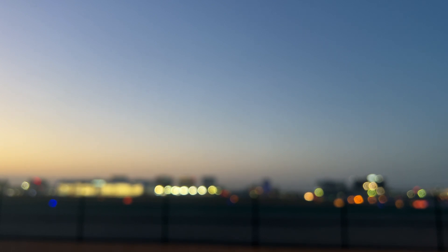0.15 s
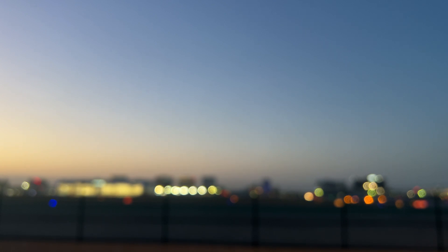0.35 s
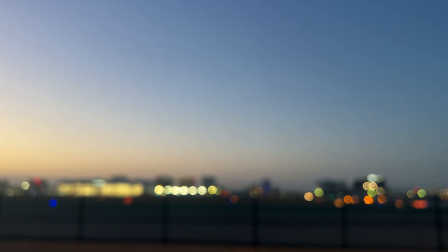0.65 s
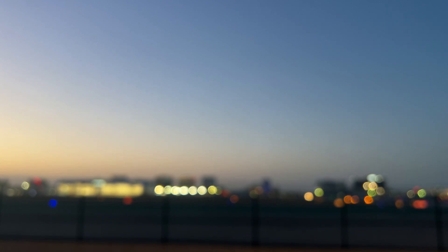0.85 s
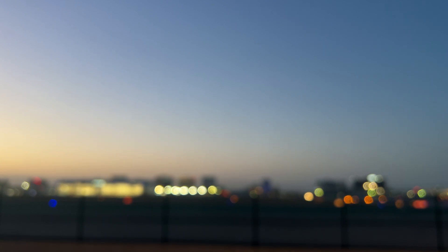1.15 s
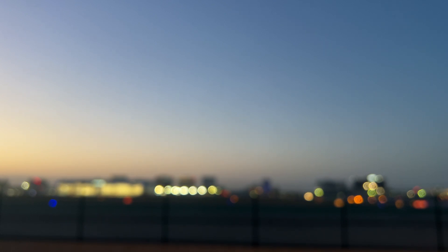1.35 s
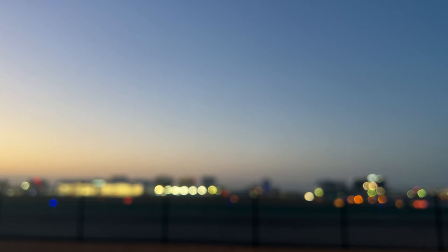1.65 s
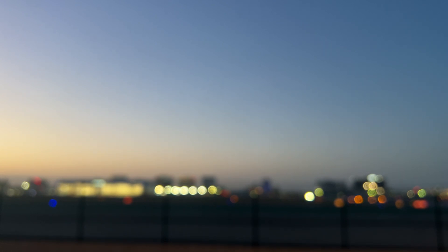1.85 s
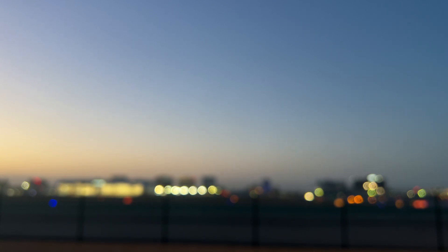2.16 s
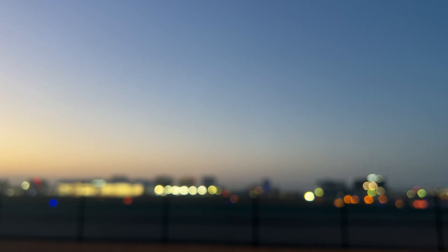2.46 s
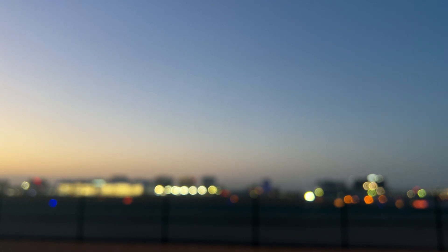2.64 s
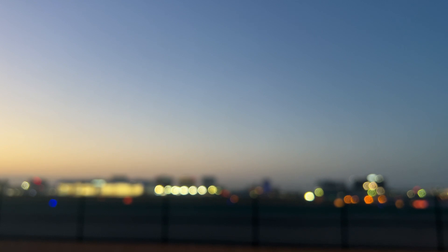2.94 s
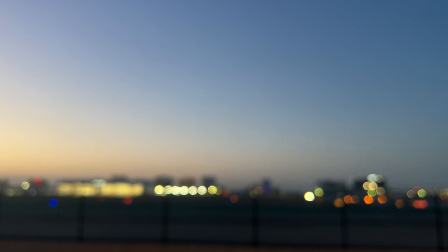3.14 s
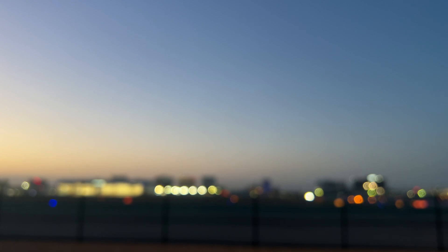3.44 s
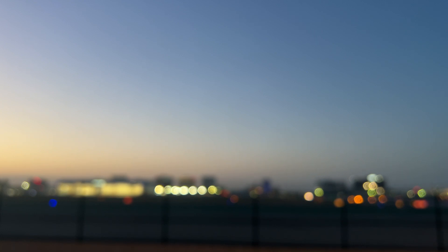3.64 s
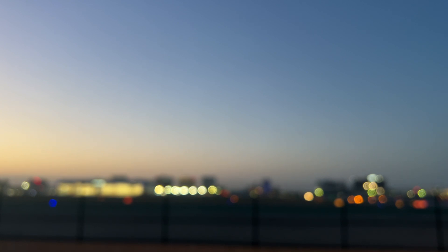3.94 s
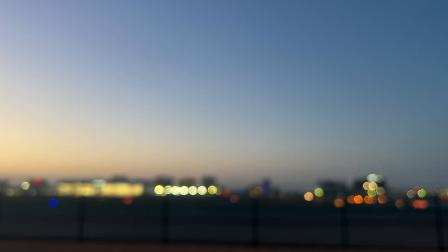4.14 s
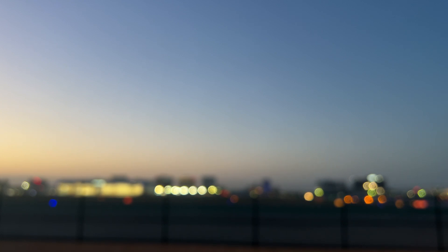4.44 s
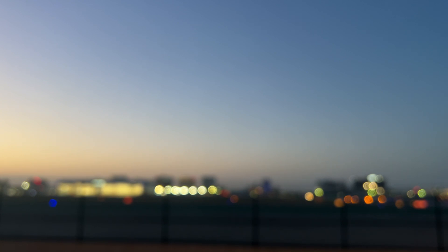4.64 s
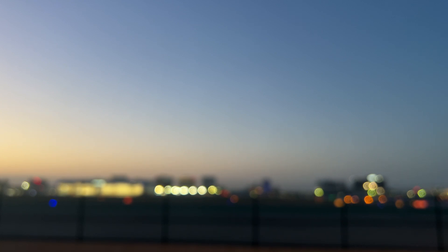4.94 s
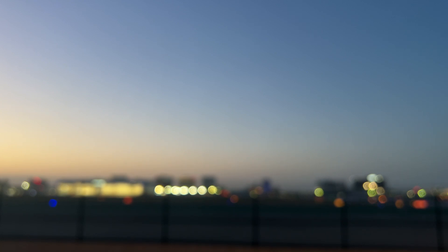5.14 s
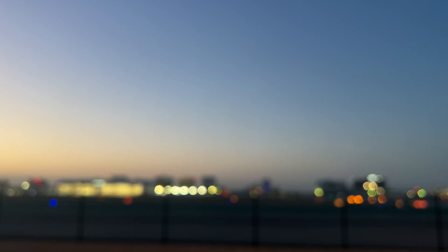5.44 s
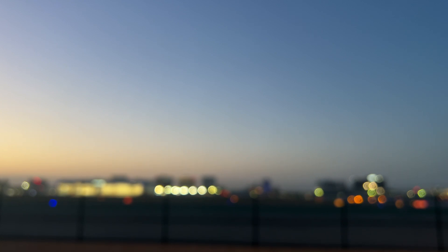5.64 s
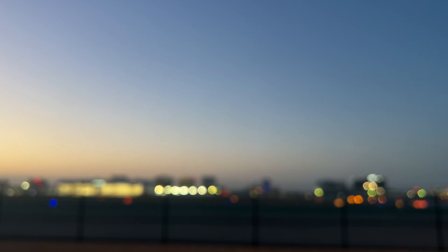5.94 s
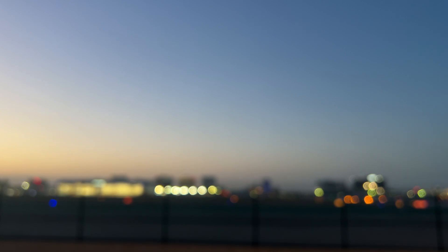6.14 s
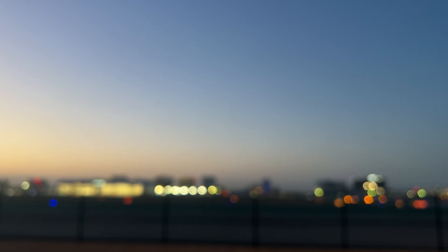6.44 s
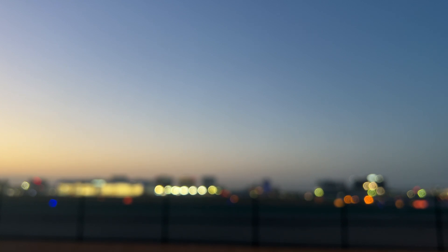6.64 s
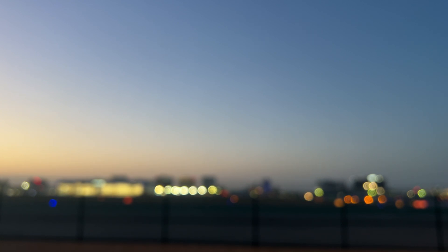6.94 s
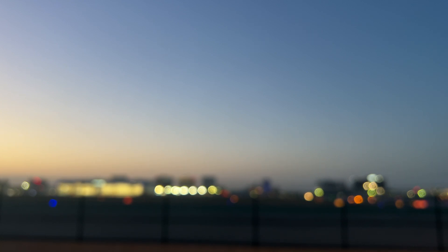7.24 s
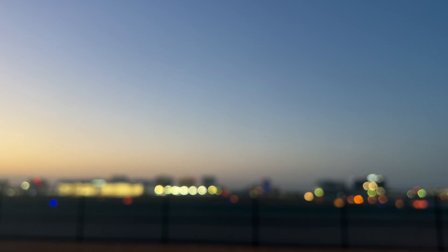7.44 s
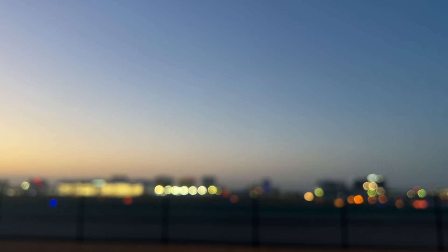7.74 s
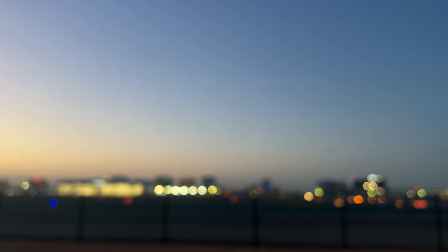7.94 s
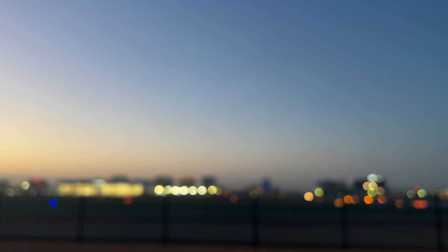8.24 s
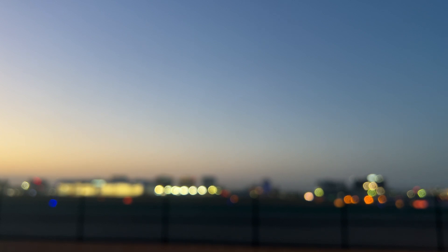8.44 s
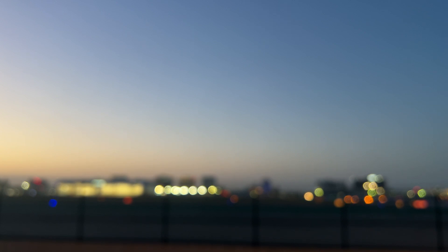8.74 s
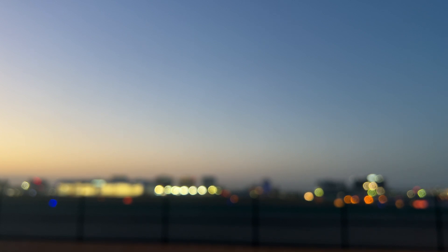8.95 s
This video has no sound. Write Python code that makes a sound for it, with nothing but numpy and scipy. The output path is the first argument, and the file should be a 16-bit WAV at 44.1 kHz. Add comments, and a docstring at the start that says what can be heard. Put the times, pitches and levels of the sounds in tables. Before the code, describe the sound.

A low rumble of distant city traffic carries across an open field for about nine seconds, with a soft tyre hiss above it. A far machine holds a deep hum and a faint whine. Throughout, slightly to the left, a very faint cricket ticks out quick, high double chirps under a thin, fluttering insect chorus. A distant engine swells briefly at the start and again between about 4 and 5.5 seconds. Soft bass swells come near 1.7 and 4 seconds. From around 5 seconds heavy trucks draw nearer, with dull, muffled booms scattered until about 8.5 seconds. Their growl and low engine note are closest just after 7 seconds, then ease a little. The machine drone, strongest at 5 seconds, sinks away by 8 seconds. Faint tyre swishes pass near the end as the rumble continues.

```python
"""A city at dusk, from across an open field, on two closely spaced microphone ports.
From the start far traffic rumbles, tyres hiss and a machine drones; in the grass a faint cricket
ticks out double chirps under a thin insect chorus. Now and then a far engine pulls. Heavy traffic
draws near with dull booms and is closest at about 7 s; the drone sinks as it passes."""
import sys
import numpy as np
from scipy.fft import rfft, irfft, next_fast_len
from scipy.io import wavfile
from scipy.ndimage import map_coordinates

SR = 44100
rng = np.random.default_rng(int(sys.argv[2]) if len(sys.argv) > 2 else 0)


def transcribe(u):
    """Save the signal u as a 16-bit wav file named by the first command-line argument.

    u: samples, shape (n,) or (channels, n), limited to [-1, 1]; the rate is SR.
    q: integer samples, one column per channel.
    """
    v = np.clip(np.atleast_2d(u).T, -1, 1)
    q = np.round(v * 32767).astype(np.int16)
    wavfile.write(sys.argv[1], SR, q)


N = 400869
T = np.arange(N) / SR

# spectrum of the road rumble: frequency_hz, density_db
RUMBLE_SPECTRUM = [(15, -42), (25, -29.5), (35, -16), (46, -11.5), (64, 1), (80, -4), (100, -5),
                   (118, -11.5), (200, -25.5), (500, -78)]


def traffic(rumble_db=-38, engines_db=-37.5, roar_db=-50):
    """Countless far vehicles merge and follow one flow; moving air makes each band drift on its own."""
    # spectra of engines, tyre roar and tyre hiss: frequency_hz, density_db
    engine_spectrum = [(60, -30.5), (112, -4), (146, -0.5), (185, 0.5), (205, -0.5), (245, -4), (270, -6.5),
                       (320, -6.5), (380, -8.5), (450, -10.5), (540, -13.5), (650, -16.5), (1000, -20),
                       (3000, -77)]
    roar_spectrum = [(250, -28), (550, -20), (750, -5.5), (980, -3), (1300, -5.5), (1550, -8), (2000, -19),
                     (3000, -48.5)]
    hiss_spectrum = [(1000, -26), (1500, -1), (1750, 0), (2000, 0.5), (2500, -3.5), (3000, -9), (3350, -10),
                     (4080, -17), (4520, -12.5), (5000, -26.5), (9000, -48.5)]
    # how busy the roads are, on top of every layer's level: time_s, gain_db
    flow = [(0, 1.5), (4.2, 0.5), (5.9, -0.9), (7.2, 0.4), (9, 0.5)]
    # the tyre hiss ebbs and returns: time_s, level_db
    hiss_levels = [(0, -57.5), (4.3, -58), (6.6, -56), (7.3, -57), (8.2, -57), (9, -57)]
    flow_db, = curves(flow)
    hiss_db, = curves(hiss_levels)
    rumble = amp(rumble_db + 0.67 * wobble(2.7)) * far_noise(RUMBLE_SPECTRUM)
    engines = amp(engines_db + 0.3 * wobble(6.6)) * far_noise(engine_spectrum)
    roar = amp(roar_db + 0.3 * wobble(18)) * far_noise(roar_spectrum)
    hiss = amp(hiss_db + 0.7 * wobble(12)) * far_noise(hiss_spectrum)
    return amp(flow_db) * (rumble + engines + roar + hiss)


def heavy_traffic(closest_s=7.27, half_power_s=2.01, rumble_db=-35.5, growl_db=-37.5, note_db=-47):
    """Lorries pass on a straight road, fading as one over distance; the nearest one's note stands out."""
    # spectrum of the heavy engines: frequency_hz, density_db
    growl_spectrum = [(60, -32), (118, -7.5), (145, 3), (190, -1.5), (240, 0), (310, -3), (380, -9.5),
                      (450, -8.5), (520, -18), (650, -17.5), (1000, -19), (3000, -76)]
    nearness = 1 / np.hypot(1, (T - closest_s) / half_power_s)
    note = amp(note_db) * swell(peak_s=7.4, width_s=1.0) * tone(hz=128, drift_hz=.7, waver_db=2.0)
    rumble = amp(rumble_db) * far_noise(RUMBLE_SPECTRUM)
    growl = amp(growl_db + 0.68 * wobble(6.2)) * far_noise(growl_spectrum)
    return note + nearness * (rumble + growl)


def booms(width_octaves=0.27):
    """Distance leaves only a rounded swell of bass from each heavy bump."""
    # far bumps: peak_s, level_db, pitch_hz, width_s
    bumps = [(1.7, -38, 60.4, 0.23), (4.1, -33, 64, 0.15), (5.207, -36, 197, 0.07),
             (5.885, -32.5, 142, 0.042), (5.89, -35, 60.4, 0.066), (6.05, -40.5, 238, .1),
             (6.85, -26, 54, 0.035), (7.057, -34, 83.5, 0.14), (7.166, -30, 173, 0.018),
             (7.346, -29.7, 61, 0.03), (8.104, -29.5, 70, 0.088), (8.307, -29, 58.7, 0.12),
             (8.59, -36, 146, 0.051)]
    total = np.zeros(N)
    for peak_s, level_db, pitch_hz, width_s in bumps:
        band = noise_band(pitch_hz, width_octaves)
        envelope = swell(peak_s, width_s)
        rms_in_swell = np.sqrt(np.average(band ** 2, weights=envelope ** 2))
        total += amp(level_db) * envelope * band / rms_in_swell
    return total


def machine_drone(hum_hz=90.24, whine_hz=440.6):
    """A far machine holds a deep hum and a faint whine; both sink late on."""
    # strength of the two tones: time_s, hum_db, whine_db
    drone_levels = [(0, -38, -58.5), (3, -39, -60), (5, -36.5, -54.5), (6.3, -41.5, -58.5),
                    (7.5, -49, -56.5), (8.1, -55, -65)]
    hum_db, whine_db = curves(drone_levels)
    hum = tone(hum_hz, drift_hz=.4, waver_db=1.0)
    whine = tone(whine_hz, drift_hz=.4, waver_db=1.0)
    return amp(hum_db) * hum + amp(whine_db) * whine


def engine_pulls(width_octaves=.07):
    """The note of one engine swells out of the rumble under load, blurred by the distance."""
    # the engine pulls, then eases off: peak_s, level_db, pitch_hz, width_s
    pulls = [(0.151, -39, 187, 0.26), (3.95, -41.5, 185.5, 0.37), (4.716, -43, 182, 0.15),
             (5.35, -39.5, 159, .1)]
    return sum(amp(level_db) * swell(peak_s, width_s) * noise_band(pitch_hz, width_octaves)
               for peak_s, level_db, pitch_hz, width_s in pulls)


def tyre_swishes(skirt_db=-20):
    """The tyres of one far car at a time rise briefly out of the wash."""
    # single cars: peak_s, level_db, pitch_hz, width_s
    cars = [(0.48, -51, 765, 0.08), (2.401, -68.5, 2810, 1.2), (8.02, -62.5, 2180, .2),
            (8.52, -60.5, 2090, 0.082)]
    total = np.zeros((2, N))
    for peak_s, level_db, pitch_hz, width_s in cars:
        spectrum = [(pitch_hz / 10, -90), (pitch_hz / 2, skirt_db), (pitch_hz, 0),
                    (pitch_hz * 2, skirt_db), (pitch_hz * 10, -120)]
        total += amp(level_db) * swell(peak_s, width_s) * far_noise(spectrum)
    return total


def cricket(start_hz=6850, end_hz=6000, scatter_hz=45, stroke_s=.012, spacing_s=.021, period_s=.124):
    """Each chirp is two wing strokes; the pitch falls as the wing slows along the file."""
    # the cricket is keenest early on: time_s, level_db
    chirp_levels = [(0.5, -68), (1, -63.5), (2, -65.5), (2.9, -63), (4.6, -67), (9, -66)]
    chirps_s = np.arange(.109, N / SR - period_s / 2, period_s)
    chirps_s += .003 * rng.standard_normal(len(chirps_s))
    progress = np.linspace(0, 1, round(stroke_s * SR))
    song = np.zeros(N + SR)
    for starts_s, stroke_db in (chirps_s - spacing_s, -3), (chirps_s, 0):  # the first stroke is softer
        for start_s, (sharpness, strength) in zip(starts_s, rng.standard_normal((len(starts_s), 2))):
            pitch_hz = start_hz + (end_hz - start_hz) * progress + scatter_hz * sharpness
            stroke = np.sin(np.pi * progress) ** 2 * np.sin(2 * np.pi * np.cumsum(pitch_hz) / SR)
            song[round(start_s * SR):][:len(stroke)] += amp(stroke_db + 2.0 * strength) * stroke
    level_db, = curves(chirp_levels)
    return amp(level_db) * song[:N] * amp([[3.0], [-3.0]])  # louder at the left port


def insects(flutter_db=0.83):
    """Many far insects blur into a soft hiss and a narrow, fluttering trill; one sings lower."""
    # spectra of the trill and the soft hiss: frequency_hz, density_db
    trill_spectrum = [(6800, -46.5), (7300, -21.5), (7550, -15.5), (7800, -5.5), (7970, -1.5), (8030, -0.5),
                      (8062, 3.5), (8100, 1), (8350, -9), (8600, -19), (8900, -42)]
    hiss_spectrum = [(3500, -46), (4500, -15), (4900, -11), (5250, -13.5), (5550, -11.5), (5870, -10),
                     (6250, -14.5), (6550, -15.5), (7100, -16.5), (7600, -10.5), (8500, -30.5),
                     (9000, -51.5)]
    # each swells and rests: time_s, level_db
    trill_levels = [(1.7, -66.5), (2.4, -72), (3.7, -66), (4.3, -65), (4.7, -69), (5.25, -67),
                    (6.15, -67.5), (6.55, -65), (7.3, -67), (8, -63.5), (8.8, -70)]
    hiss_levels = [(0, -67), (1.1, -65.5), (2.2, -66.5), (6.3, -66.5), (7.25, -65), (8.1, -65), (8.8, -68)]
    # a lone insect's held note: pitch_hz, level_db, width_octaves
    lone_note = (6430, -86, .005)
    trill_db, = curves(trill_levels)
    hiss_db, = curves(hiss_levels)
    lone_hz, lone_db, lone_octaves = lone_note
    trill = amp(trill_db + flutter_db * wobble(30)) * far_noise(trill_spectrum)
    hiss = amp(hiss_db + .3 * wobble(4.2) + 0.82 * wobble(25)) * far_noise(hiss_spectrum)
    return trill + hiss + amp(lone_db) * noise_band(lone_hz, lone_octaves)


def far_noise(spectrum):
    """Stereo noise of rms 1: alike at both ports in the bass, shifted and less alike higher up."""
    # far sound at the two ports: frequency_hz, likeness (0-1), left_lead_rad
    ports = [(90, 0.97, .05), (235, 0.86, 0.15), (390, 0.76, 0.41), (574, .58, 1.98), (660, 0.7, 2.25),
             (720, 0.72, 2.76), (1020, 0.72, 2.57), (1193, 0.05, 3.7), (1506, 0.79, 3.15), (1807, 0.3, 4.4),
             (1900, 0.2, 6.2), (2140, 0.7, 6.45), (2690, 0.8, 6.7), (3160, 0.2, 8.85), (3800, 0.01, 9.4),
             (4470, 0.4, 9.5), (5480, 0.3, 11.4), (5720, 0.3, 15), (6130, 0.3, 17), (7370, 0.3, 10.7),
             (8000, 0.6, 13)]
    # balance between the ports: frequency_hz, left_minus_right_db
    balance = [(100, -0.5), (450, 0.8), (750, 0), (1100, -2), (1400, 0.5), (1900, -0.5), (2500, -3),
               (3400, 0), (4500, 3), (5700, 12.5), (7500, 8.5), (8100, 4.5)]
    size = next_fast_len(N + 8192)
    hz = np.fft.rfftfreq(size, 1 / SR)
    common, apart = rfft(rng.standard_normal((2, size)))
    likeness, lead_rad = along(ports, hz)
    blend_rad = np.arccos(np.clip(likeness, 0, 1)) / 2
    side = np.array([[1], [-1]])  # left, right
    pair = np.cos(blend_rad) * common + side * np.sin(blend_rad) * apart
    pair *= np.exp(.5j * side * lead_rad)
    colour = amp(along(spectrum, hz)[0] + side * along(balance, hz)[0] / 2)
    return unit(irfft(pair * colour, size)[:, :N])


def noise_band(pitch_hz, width_octaves):
    """Noise of rms 1 in a bell around one pitch."""
    noise = rng.standard_normal(N)
    return unit(filtered(noise, lambda hz: np.exp(-.5 * (np.log2((hz + 1) / pitch_hz) / width_octaves) ** 2)))


def tone(hz, drift_hz, waver_db):
    """A clean far tone of rms 1 that drifts and wavers a little."""
    gain = amp(waver_db * wobble(5))
    pitch_hz = hz + drift_hz * wobble(1.5)
    return unit(gain * np.sin(2 * np.pi * np.cumsum(pitch_hz) / SR))


def swell(peak_s, width_s):
    """A bell in time, of height 1 and standard deviation width_s."""
    return np.exp(-.5 * ((T - peak_s) / width_s) ** 2)


def wobble(rate):
    """A smooth random curve, rate knots a second."""
    knots = rng.standard_normal(int(N * rate / SR) + 4)
    return map_coordinates(knots, [np.arange(N) * rate / SR])


def curves(rows):
    """One value per sample for each column after the time."""
    time_s, *columns = np.transpose(rows)
    return [np.interp(T, time_s, column) for column in columns]


def along(rows, hz):
    """Each column after the frequency, read at hz on a log axis."""
    row_hz, *columns = np.transpose(rows)
    return [np.interp(np.log(hz + 1), np.log(row_hz + 1), column) for column in columns]


def filtered(x, response):
    """x shaped by a gain that depends on frequency."""
    size = next_fast_len(N + SR // 2)
    return irfft(rfft(x, size) * response(np.fft.rfftfreq(size, 1 / SR)), size)[..., :N]


def amp(db):
    """Decibels to gain."""
    return 10 ** (np.asarray(db) / 20)


def unit(x):
    """x at rms 1."""
    return x / np.sqrt(np.mean(x ** 2) + 1e-20)


def scene():
    """The city far away, the insects in the field."""
    city = traffic() + heavy_traffic() + tyre_swishes() + engine_pulls() + machine_drone() + booms()
    return city + insects() + cricket()


def record(dry):
    """The recorder keeps nothing above its band limit."""
    limit_hz = 8800
    return filtered(dry, lambda hz: 1 / np.sqrt(1 + (hz / limit_hz) ** 300))


dry = scene()
out = record(dry)
transcribe(out)
```